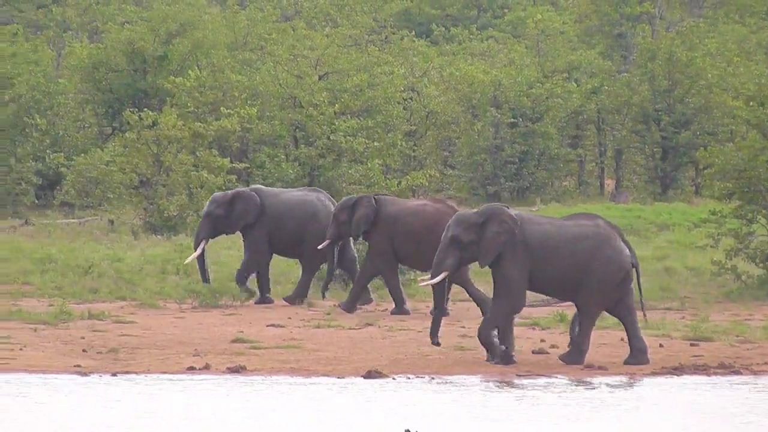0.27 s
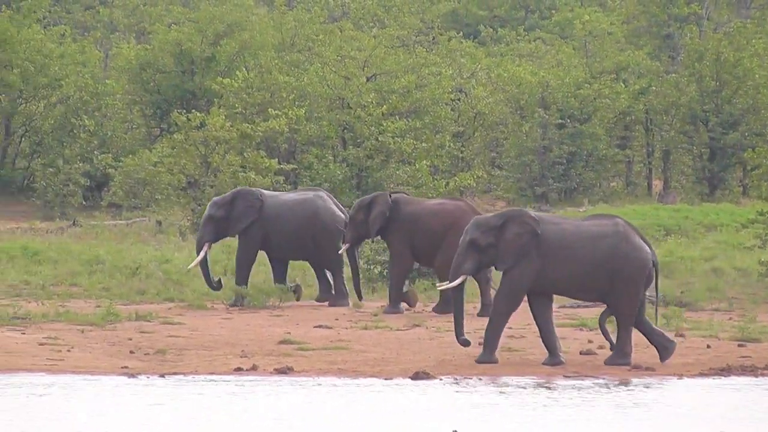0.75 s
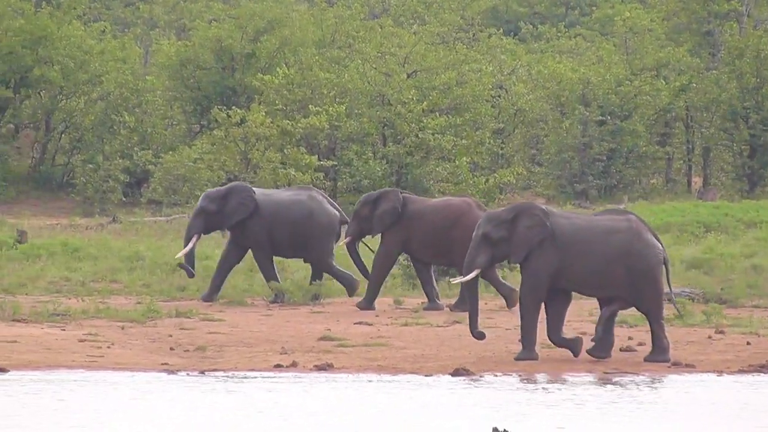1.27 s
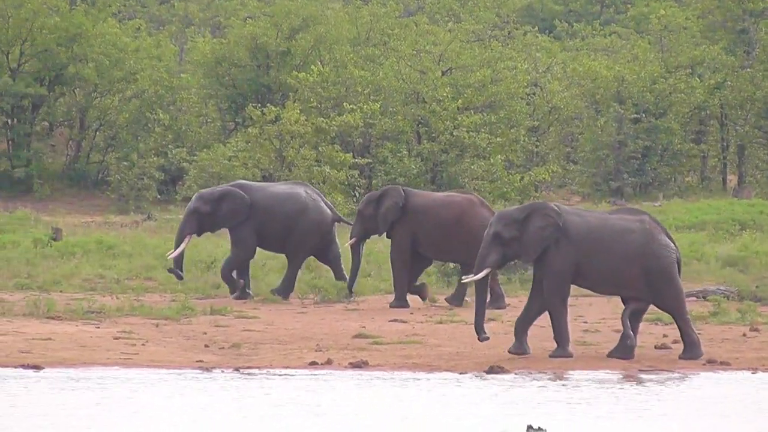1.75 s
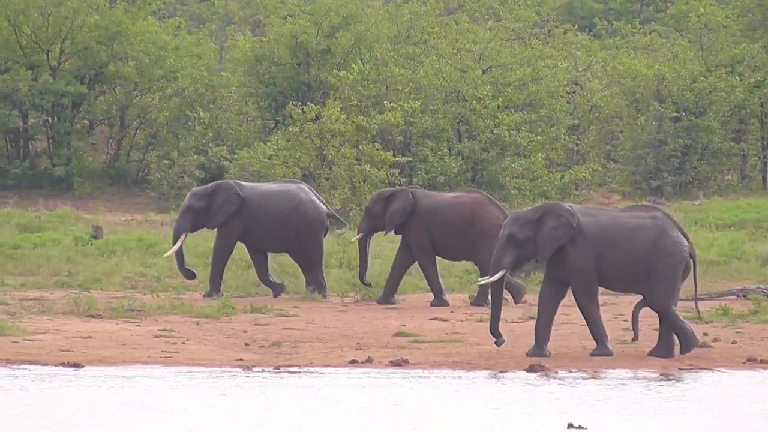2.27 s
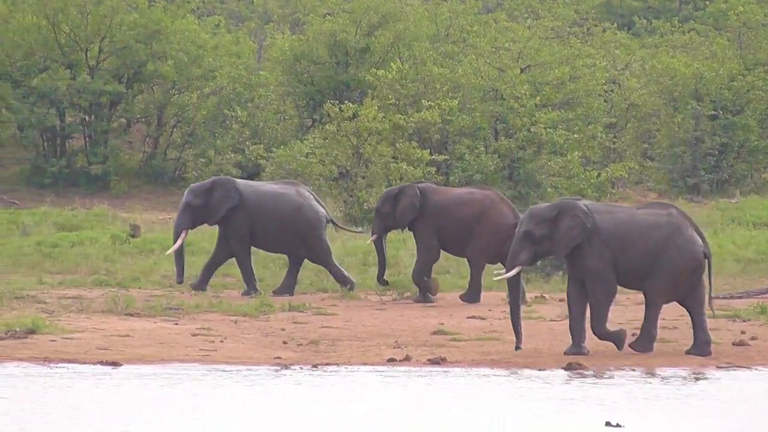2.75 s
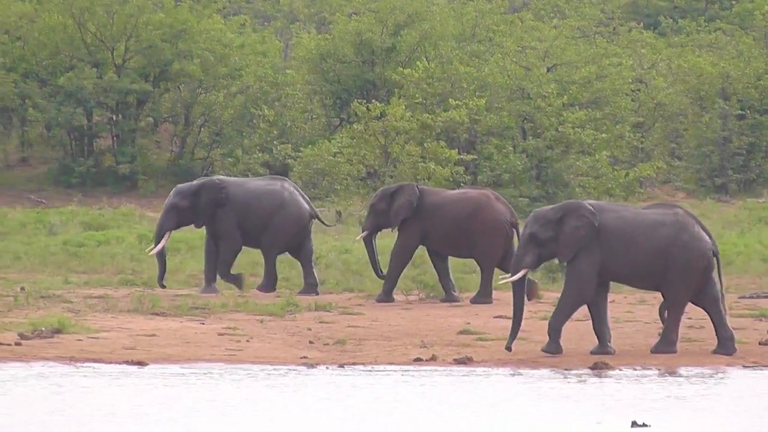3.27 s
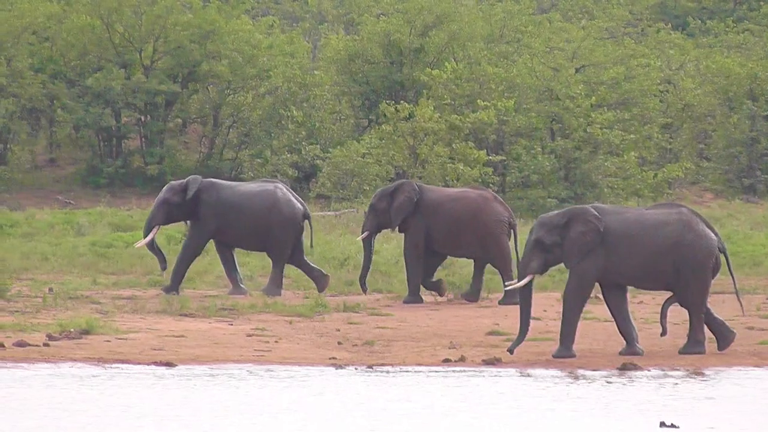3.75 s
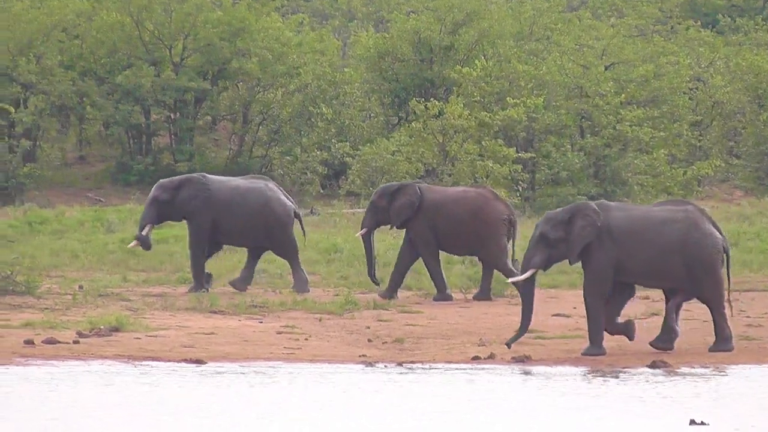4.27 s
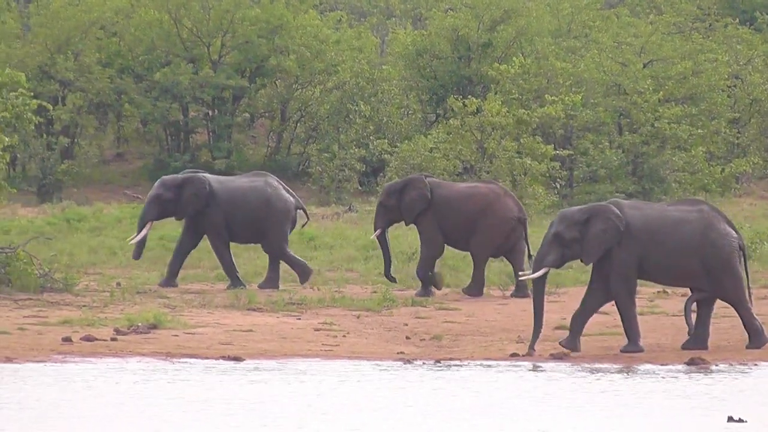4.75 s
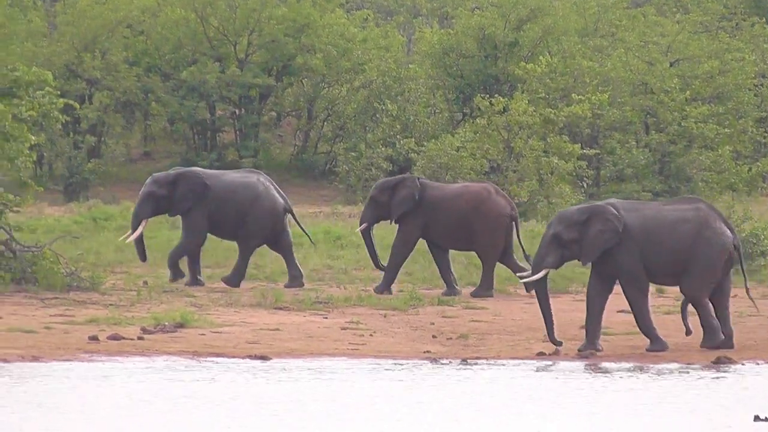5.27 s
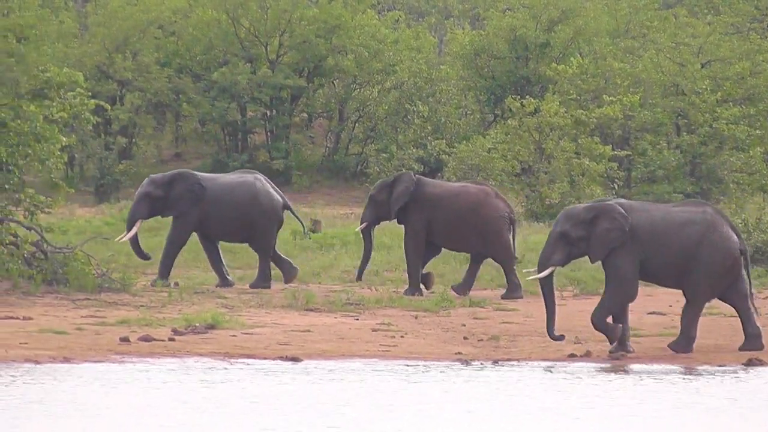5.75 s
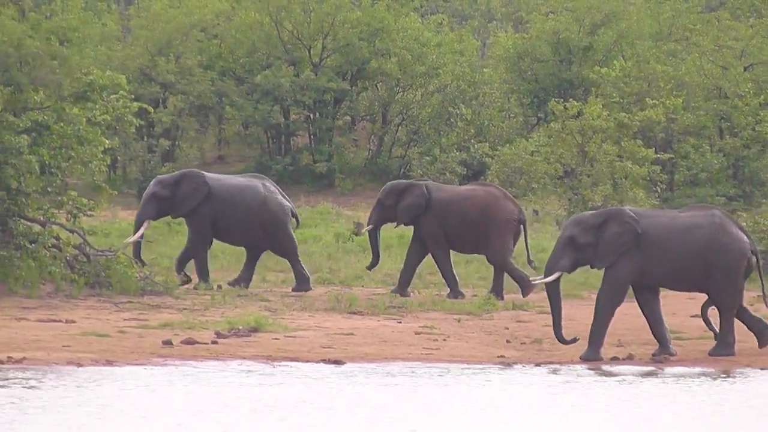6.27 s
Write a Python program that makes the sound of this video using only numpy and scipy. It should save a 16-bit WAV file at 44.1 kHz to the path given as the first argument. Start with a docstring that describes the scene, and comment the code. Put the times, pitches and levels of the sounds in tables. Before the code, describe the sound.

A breeze buffets the microphone over faint sloshing water, rustling leaves, birds and insects, with one sharp click midway.

```python
"""A breeze rushes and rumbles in the hollows of a camera body at a waterhole, bumping it now and then.
Midway, something clicks sharply against the housing, rings its modes and overloads the microphone.
Behind that, leaves rustle and shallow water sloshes and splashes (shaped noise, with pinging bubbles).
Small birds chip and whistle in gliding tones, far insects shimmer, and one insect starts to pulse
after the click. The microphone hisses throughout."""
import sys
import numpy as np
from scipy import signal
from scipy.fft import rfft
from scipy.io import wavfile
from scipy.ndimage import uniform_filter1d

SR = 44100
rng = np.random.default_rng(int(sys.argv[2]) if len(sys.argv) > 2 else 0)


def generate_wav(signal):
    """Clip the signal to [-1, 1] and save it as 16-bit WAV at the path in sys.argv[1]."""
    frames = np.transpose(np.atleast_2d(signal))
    scaled = np.clip(frames, -1, 1) * 32767
    pcm = np.round(scaled).astype(np.int16)
    wavfile.write(sys.argv[1], SR, pcm)


N = 287091
T = np.arange(N) / SR


def undb(db):
    """Decibels to gain."""
    return 10 ** (np.asarray(db) / 20)


def unit(x):
    """Scale to an rms of 1."""
    return x / np.sqrt(np.mean(x ** 2))


def curve(points):
    """Join (seconds, value) points with straight lines."""
    return np.interp(T, *np.transpose(points))


def colour(x, points):
    """Equalise x through (Hz, dB) points and scale it to an rms of 1."""
    hz, db = np.transpose(points)
    bins_hz = np.maximum(np.arange(N // 2 + 1) * SR / N, 1)
    gain = undb(np.interp(np.log(bins_hz), np.log(hz), db))
    return unit(np.fft.irfft(rfft(x) * gain, N))


def low_cut(x, hz):
    """Thin the bass below the given frequency."""
    return signal.sosfilt(signal.butter(2, hz, "high", fs=SR, output="sos"), x)


def noise():
    """White noise."""
    return rng.standard_normal(N)


def wander(rate):
    """Smooth random motion with an rms of 1, changing about rate times a second."""
    hold = max(int(SR / rate), 1)
    steps = np.repeat(rng.standard_normal(N // hold + 1), hold)
    return unit(uniform_filter1d(steps, hold)[:N])


def steady(x, seconds):
    """Even out swells slower than the given time."""
    return x / np.sqrt(uniform_filter1d(x ** 2, int(seconds * SR)) + 1e-9)


def burst(start, rise, decay):
    """An envelope that rises fast and dies away; times in seconds."""
    age = np.maximum(T - start, 0)
    return (1 - np.exp(-age / rise)) * np.exp(-age / decay)


def ring(start, modes, rise, cycles=0.98, size=16000):
    """Struck modes build up, low ones more slowly, and decay; neighbours swing opposite ways."""
    age = np.arange(size) / SR
    tone = np.zeros(size)
    for k, (hz, db, t60) in enumerate(modes):
        swell = 1 - np.exp(-(age / (rise + cycles / hz)) ** 2)
        tone += (-1) ** k * swell * undb(db - 60 * age / t60) * np.sin(2 * np.pi * hz * age)
    out = np.zeros(N + size)
    first = int(np.clip(start * SR, 0, N))
    out[first:first + size] = tone
    return out[:N]


def breeze(rush_db=0.9, rumble_db=-7.5, gust_db=0.5, rumble_gust_db=2.0, eddy_s=0.029):
    """One wind drives a rush and a low rumble in the camera's hollows; single eddies swell on top."""
    # Wind strength. Each row: time in seconds, relative level in dB.
    strength = [(0, -42), (.4, -42.5), (.6, -42.5), (.8, -42.5), (.97, -45), (1.07, -42.5), (1.5, -43.5),
                (1.67, -44.5), (1.77, -44.5), (1.97, -46.5), (2.25, -42.5), (2.7, -45), (3.03, -44),
                (3.18, -48.5), (3.38, -44.5), (3.65, -48), (3.74, -48), (3.84, -46.5), (4.1, -49),
                (4.5, -44.5), (4.67, -47), (4.85, -45.5), (5.15, -44.5), (5.45, -43), (5.6, -43),
                (5.75, -43), (5.85, -48.5), (5.97, -50), (6.3, -50.5), (6.47, -46)]
    # Eddies buffeting the camera. Each row: centre in seconds, rush level in dB, rumble level in dB.
    eddies = [(.055, -44, -37.5), (.37, -51, -42), (.67, -59, -48), (.78, -47, -45), (1.06, -53, -46),
              (1.45, -44.5, -46), (1.87, -61, -47), (2.45, -43.5, -51), (3.31, -50, -51),
              (3.52, -44.5, -45), (3.685, -40.5, -64), (3.91, -43.5, -54), (4.19, -48, -69),
              (4.35, -48, -50), (4.5, -54, -46), (5.04, -42, -49), (5.39, -50, -42.5), (5.6, -43, -48),
              (5.68, -41, -60), (6.07, -45.5, -56)]
    # Tone of the rush and of the rumble. Each row: frequency in Hz, gain in dB.
    rush_eq = [(330, -17), (410, -17.5), (560, -8), (660, 0.5), (800, -0.5), (910, -9.5), (990, -9.5),
               (1080, -16.5), (1260, -8.5), (1450, -14), (1660, -14.5), (1800, -11.5), (2020, -12),
               (2300, -30), (2880, -28.5), (3700, -36), (7000, -60)]
    rumble_eq = [(20, 4.5), (55, -29), (100, -16), (160, -6), (215, 2), (255, 3), (310, -5), (390, -21.5),
                 (600, -47)]
    wind_db = curve(strength) + gust_db * wander(9)
    rush_gain = undb(wind_db + rush_db)
    rumble_gain = undb(wind_db + rumble_db + rumble_gust_db * wander(12))
    for centre, eddy_rush_db, eddy_rumble_db in eddies:
        swell = np.exp(-((T - centre) / eddy_s) ** 2)
        rush_gain = np.hypot(rush_gain, undb(eddy_rush_db) * swell)
        rumble_gain = np.hypot(rumble_gain, undb(eddy_rumble_db) * swell)
    flutter = undb(1.1 * wander(35) + 0.9 * wander(170))
    rush = steady(colour(noise() * flutter, rush_eq), seconds=0.21)
    rumble = steady(colour(noise() * flutter, rumble_eq), seconds=0.096)
    return rush_gain * rush + rumble_gain * rumble


def body_bumps():
    """The breeze knocks softly on the camera body; some knocks are dull, others bright."""
    # The blows. Each row: start in seconds, peak in dB, brightness tilt in dB per octave.
    blows = [(.049, -22, -5), (.075, -33, -2), (.171, -31.5, 2), (.245, -28, -6), (.330, -24, -4),
             (.478, -31, -19), (.824, -30.5, -6), (1.052, -29.5, -12), (1.398, -31.5, 1),
             (1.528, -31.5, -5), (1.875, -34.5, 5), (2.163, -32.5, -9), (2.214, -29, -4),
             (2.247, -28.5, -3), (3.010, -31.5, 3), (3.375, -31, 2), (3.609, -31.5, 7), (3.712, -34, -3),
             (3.899, -35, -8), (5.0226, -22.5, 16.5), (5.382, -33, -18), (5.4245, -30.5, 3),
             (5.592, -28, 3), (5.676, -32, -4), (5.708, -30.5, -2), (5.825, -30, 11)]
    # Modes of the body. Each row: frequency in Hz, relative level in dB, t60 in seconds.
    body_modes = [(248, -14, 0.054), (665, 3.5, 0.048), (791, 4.5, 0.049), (1270, 3.5, 0.015),
                  (1870, -12, 0.0072)]
    out = np.zeros(N)
    for start, peak_db, tilt in blows:
        tilted = [(hz, db + tilt * np.log2(hz / 800), t60) for hz, db, t60 in body_modes]
        blow = ring(start, tilted, rise=0.00053)
        out += blow / np.abs(blow).max() * undb(peak_db)
    return out


def housing_click(start=2.8282, grit_db=2.0, side_hz=1070):
    """A hard contact cracks, rings the housing and leaves grit and a shudder; returns mid and side."""
    # Modes of the housing. Each row: frequency in Hz, relative level in dB, t60 in seconds.
    modes = [(186, -1.8, 0.048), (192.5, -26, 0.23), (267, -19.5, 0.082), (377, -30.5, 0.1),
             (576, -10.5, 0.028), (700, -15.5, 0.022), (935, -20.5, 0.07), (1080, -6, 0.025),
             (1280, -10, 0.026), (1636, -4, 0.02), (1830, -37, 0.18), (2190, -8.5, 0.019),
             (2670, -13.5, 0.014), (3220, -18, 0.013), (5120, -9.5, 0.015), (8420, -9, 0.014),
             (9200, -3.5, 0.012), (9880, -1, 0.012), (11030, -7, 0.0082), (11900, -1, 0.011),
             (13300, -11, .008), (14600, -5, 0.01)]
    # Tone of the crack, gritty tail, low shudder and air jolt. Each row: frequency in Hz, gain in dB.
    crack_eq = [(60, -40), (300, -14), (1500, -4), (4000, -17.5), (6500, -6.5), (7600, -18), (8500, 1),
                (9700, -10), (11900, -2), (14500, -9), (15500, -16), (16000, -26)]
    tail_eq = [(60, -30), (400, -5), (1900, -5), (3500, -8.5), (5100, -8), (6300, -4), (7500, -20),
               (8600, 2), (10500, -14), (15000, -28)]
    shudder_eq = [(40, -42), (80, -24), (120, -7), (170, 2), (230, -9), (400, -15.5), (700, -38),
                  (3000, -60)]
    jolt_eq = [(30, 13), (90, -4), (160, -1), (400, 4), (700, -5), (2000, -46)]
    contact = burst(start - .0003, rise=0.00035, decay=0.0027)
    crack = undb(-5) * steady(colour(noise(), crack_eq), 0.0014) * contact
    side_crack = undb(-26) * steady(colour(noise(), crack_eq), 0.0014) * contact
    grit = colour(noise() * undb(grit_db * wander(450)), tail_eq)
    tail = undb(-35.5) * grit * burst(start, rise=.002, decay=0.019)
    lows = steady(colour(noise(), shudder_eq), 0.018)
    shudder = undb(-36) * lows * burst(start, rise=0.006, decay=0.056)
    housing = low_cut(ring(start - .0001, modes, rise=0.0011, cycles=0.45), hz=125)
    # Modes near side_hz reach the two microphone ports out of step.
    side_modes = [(hz, db - 22 * abs(np.log2(hz / side_hz)), t60) for hz, db, t60 in modes]
    side_ring = undb(-10) * ring(start + .00012, side_modes, rise=0.00095, cycles=0.46)
    # The jolt pushes air unevenly into the ports.
    air = steady(colour(noise(), jolt_eq), .008)
    jolt = undb(-24) * air * burst(start, rise=.001, decay=0.007)
    return crack + housing + tail + shudder, side_ring + side_crack + jolt


def leaves(grain_db=1.5, gain_db=5.5):
    """Leaves rustle in a fine, grainy bed that swells and sinks."""
    # The swells. Each row: time in seconds, relative level in dB.
    swells = [(0, -64.5), (.27, -62.5), (.5, -64.5), (.85, -61), (1.15, -63.5), (1.5, -63.5), (1.8, -64.5),
              (2.15, -68.5), (2.28, -67), (2.36, -64.5), (2.52, -60.5), (2.8, -64.5), (3.15, -64.5),
              (3.35, -62.5), (3.65, -62.5), (3.82, -68), (4.0, -66), (4.25, -67), (4.8, -65.5), (5.2, -64),
              (5.45, -62.5), (5.8, -63), (6.0, -60), (6.06, -59.5), (6.25, -66.5), (6.45, -64.5)]
    # Tone of the rustle. Each row: frequency in Hz, gain in dB.
    rustle_eq = [(1800, 0), (2900, -3.5), (3600, -6), (4050, -1), (4400, -6.5), (4900, 2), (5750, 1.5),
                 (5950, -2), (6750, -4), (7300, -10), (7650, -14.5), (9000, -5.5), (15000, -25)]
    grains = noise() * undb(grain_db * wander(500))
    return undb(curve(swells) + gain_db) * colour(grains, rustle_eq)


def splashes(rise_share=0.14):
    """Small far splashes throw droplets and fine mist; longer sprays start more softly."""
    # The sprays. Each row: start in seconds, level in dB, decay in seconds, mist against drops in dB.
    sprays = [(.171, -50, .005, -5), (.926, -48, 0.0046, -3), (1.127, -49, .005, -12),
              (1.225, -56, .005, -4), (1.596, -50, .006, -6), (1.908, -45, .006, -8),
              (2.335, -51, .012, -10), (2.475, -43, 0.004, 3), (2.556, -48.5, .006, 0),
              (3.038, -50, .006, -5), (4.12, -55, 0.0044, -6), (5.612, -46, .0062, -5),
              (5.823, -51, .008, -1), (5.886, -49, .019, -8), (5.904, -51, .016, -8),
              (5.953, -48, 0.015, -10), (6.035, -54, 0.045, -4)]
    # Tone of the droplets and of the mist. Each row: frequency in Hz, gain in dB.
    drops_eq = [(1500, -23), (3100, 1.5), (3800, -5.5), (4700, 0.5), (5400, 1), (6000, -4), (7000, -3),
                (7700, -19), (10000, -35)]
    mist_eq = [(7000, -40), (7800, -22), (8900, 4), (11000, -2), (15000, -14)]
    drops, mist = np.zeros(N), np.zeros(N)
    for start, db, decay, mist_db in sprays:
        spray = undb(db) * burst(start, rise_share * decay, decay)
        drops += spray
        mist += undb(mist_db) * spray
    return drops * colour(noise(), drops_eq) + mist * colour(noise(), mist_eq)


def sloshes(gurgle_db=2.5):
    """Water pushed aside swells and sinks back, gurgling."""
    # The swells. Each row: centre in seconds, length in seconds, level in dB.
    swells = [(1.265, 0.094, -47.5), (1.39, 0.11, -65), (1.504, .06, -54), (1.784, 0.061, -47),
              (2.352, 0.078, -48.5), (2.66, .08, -62), (3.305, 0.092, -59), (3.558, 0.09, -52),
              (3.625, .06, -48), (3.725, 0.11, -48), (3.921, 0.09, -46.5), (4.12, 0.14, -55),
              (4.392, 0.068, -48), (4.506, .1, -52), (4.68, 0.092, -54.5), (5.852, .12, -51.5),
              (6.034, 0.29, -54), (6.296, 0.2, -56.5)]
    # Tone of the water. Each row: frequency in Hz, gain in dB.
    water_eq = [(300, -25), (500, -7), (800, -9), (1080, -4), (1270, 1.5), (1650, -9.5), (1950, 1.5),
                (2300, -21), (4000, -31), (8000, -55)]
    envelope = sum(undb(db) * np.exp(-(2 * (T - centre) / length) ** 2) for centre, length, db in swells)
    return envelope * colour(noise() * undb(gurgle_db * wander(120)), water_eq)


def bubbles(decay_s=0.002, glide=.02, pitch_spread=.03, count=6, size=400):
    """Clusters of tiny bubbles ping around one pitch, each rising a little as it dies."""
    # The clusters. Each row: centre in seconds, length in seconds, pitch in Hz, level per bubble in dB.
    clusters = [(5.887, .008, 5400, -47), (5.901, .009, 5560, -44), (5.911, .007, 5480, -45),
                (5.924, .016, 5500, -49), (5.956, .005, 5570, -51), (5.957, .006, 5020, -44)]
    out = np.zeros(N + size)
    age = np.arange(size) / SR
    for centre, length, hz, db in clusters:
        for k, (late, detune) in enumerate(rng.random((count, 2))):
            first = int((centre + length * ((k + late) / count - .5)) * SR)
            pitch = hz * (1 + pitch_spread * (2 * detune - 1)) * (1 + glide * age / age[-1])
            ping = np.exp(-age / decay_s) * np.sin(2 * np.pi * np.cumsum(pitch) / SR)
            out[first:first + size] += undb(db) * ping
    return out[:N]


def birds(arch=0.061, waver=0.0109, lift=.007, echo_db=-9.0, gain_db=-1):
    """Chips arch in pitch and end on a brief lower note; whistles lift slightly; leaves scatter both."""
    # One bird's chips, another's thin whistles.
    # Each row: centre in seconds, length in seconds, fundamental at the centre in Hz, level in dB.
    chips = [(3.319, .024, 1890, -48.5), (3.917, 0.021, 1925, -43.5), (4.371, 0.03, 1930, -51.5),
             (4.813, 0.035, 1945, -59)]
    whistles = [(0.929, .014, 4050, -58), (1.135, 0.028, 5350, -62), (1.49, .016, 3800, -60.5),
                (1.552, .016, 4200, -60), (1.604, 0.02, 5150, -60), (2.75, 0.021, 3420, -55),
                (3.52, 0.027, 5350, -58), (4.796, 0.073, 2890, -50), (6.39, .06, 4300, -65)]
    # Harmonics of a chip. Each row: multiple of the fundamental, gain in dB.
    harmonics = [(2, -12), (3, 1), (4, -15)]
    calls = np.zeros(N)
    wobble = waver * wander(900)
    end_notes = [(centre + 0.78 * length, .4 * length, 0.93 * hz, db - 6)
                 for centre, length, hz, db in chips]
    for centre, length, hz, db in chips + end_notes:
        place = np.clip(2 * (T - centre) / length, -2, 2)  # -1 to 1 across the note
        phase = 2 * np.pi * np.cumsum(hz * (1 + wobble - arch * place ** 2)) / SR
        voice = sum(undb(harmonic_db) * np.sin(k * phase) for k, harmonic_db in harmonics)
        calls += undb(db) * np.exp(-place ** 4) * voice
    for centre, length, hz, db in whistles:
        place = np.clip(2 * (T - centre) / length, -2, 2)
        phase = 2 * np.pi * np.cumsum(hz * (1 + wobble + lift * place)) / SR
        calls += undb(db) * np.exp(-place ** 8) * np.sin(phase)
    scatter = (noise() * burst(0, rise=.002, decay=.045))[:SR]
    echo = signal.fftconvolve(calls, scatter / np.linalg.norm(scatter))[:N]
    return undb(gain_db) * (calls + undb(echo_db) * echo)


def insect(start=3.66, fade_s=.24, chirps_per_s=9.918, pitch_hz=8370, level_db=-53.5):
    """Each chirp is a weak, lower stroke, then the main one; scatter from the bush fills the gaps."""
    cycle = (T * chirps_per_s + .63) % 1 - .5
    opening = np.exp(-((cycle + 0.16) / .066) ** 2)
    closing = np.exp(-(cycle / .066) ** 2)
    hz = pitch_hz - 110 * opening + 55 * wander(700)
    strokes = (closing + undb(-7) * opening) * undb(1.2 * wander(40))
    scatter = undb(-16) * wander(250)
    fade_in = np.clip((T - start) / fade_s, 0, 1)
    return undb(level_db) * fade_in * (strokes + scatter) * np.sin(2 * np.pi * np.cumsum(hz) / SR)


def far_insects(shimmer_db=2.0):
    """A narrow, shimmering band of distant insects comes and goes."""
    # The swells. Each row: time in seconds, level in dB.
    swells = [(0, -66), (.35, -59.5), (.5, -69), (.7, -61), (1.25, -65.5), (2.05, -69), (2.62, -63),
              (3.05, -70), (3.65, -70), (3.82, -71), (4.6, -67.5), (5.2, -71), (5.42, -62.5), (5.9, -61),
              (6.25, -71)]
    # Tone of the chorus. Each row: frequency in Hz, gain in dB.
    chorus_eq = [(2000, -43), (2550, -15), (2780, -0.5), (2900, -2), (3100, -9.5), (3600, -18), (5000, -50)]
    return undb(curve(swells)) * colour(noise() * undb(shimmer_db * wander(60)), chorus_eq)


def microphone_hiss(level_db=-53.0):
    """The microphone's own steady, bright noise."""
    # Tone of the hiss. Each row: frequency in Hz, gain in dB.
    hiss_eq = [(3000, -20.5), (6800, -15), (7700, -33), (8100, -13), (8600, -5), (8950, -0.5), (9400, -1),
               (11200, 1.5), (13000, -1.5), (16000, -5)]
    return undb(level_db) * colour(noise(), hiss_eq)


def port_wind(level_db=-67.5):
    """A trace of wind that differs between the two microphone ports."""
    # Tone of that wind. Each row: frequency in Hz, gain in dB.
    wind_eq = [(25, 13.5), (70, 5), (120, 2), (230, 1.5), (400, 6), (700, -2), (1300, -5.5), (2400, -106),
               (4400, -40), (8000, -30.5), (15000, -59)]
    return undb(level_db) * colour(noise(), wind_eq)


def scene():
    """Nearly everything sits in the centre; a little wind and the click add stereo width."""
    hiss = microphone_hiss()
    click_mid, click_side = housing_click()
    mid = breeze() + body_bumps() + click_mid
    mid += leaves() + splashes() + sloshes() + bubbles()
    mid += birds() + insect() + far_insects() + hiss
    side = port_wind() + click_side
    return np.array([mid + side, mid - side])


def record(dry, low_cut_hz=95, top_hz=15800):
    """A wind filter thins the bass, the input clips at full scale and the top is cut steeply."""
    clipped = np.clip(low_cut(dry, low_cut_hz), -1, 1)
    return signal.sosfilt(signal.ellip(10, .1, 70, top_hz, fs=SR, output="sos"), clipped)


dry = scene()
out = record(dry)
generate_wav(out)
```